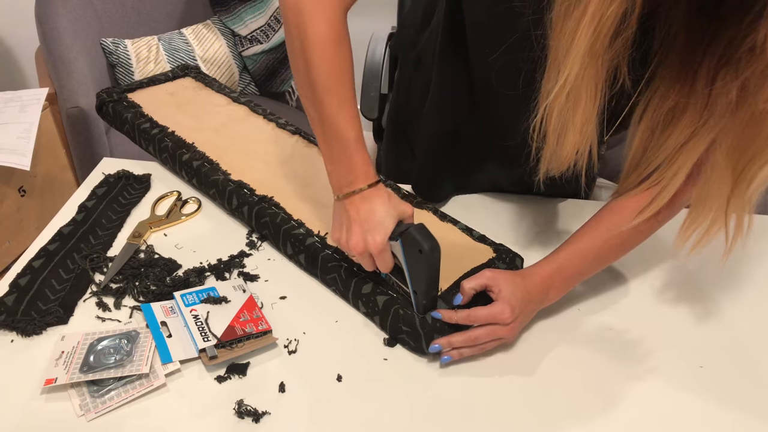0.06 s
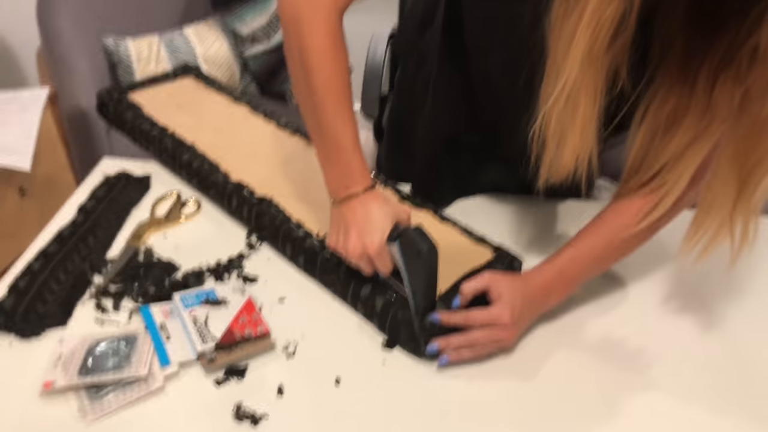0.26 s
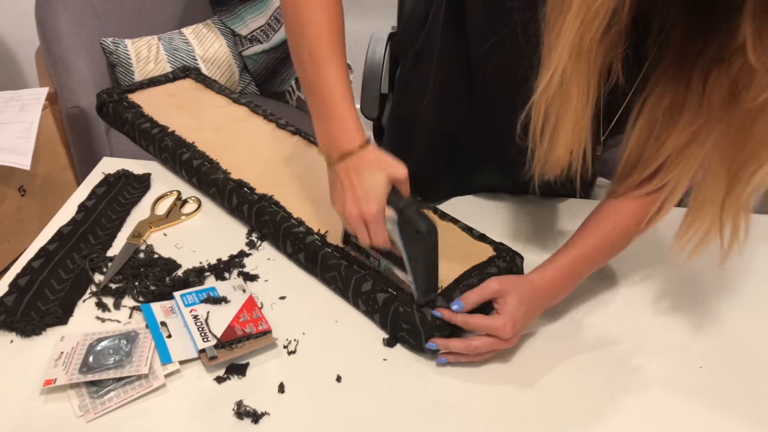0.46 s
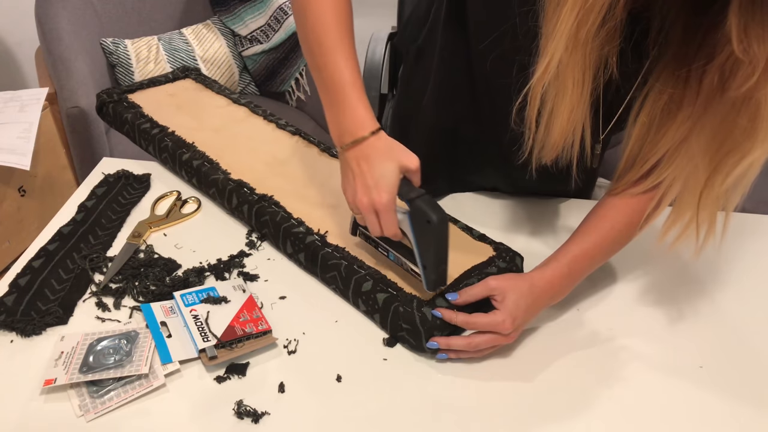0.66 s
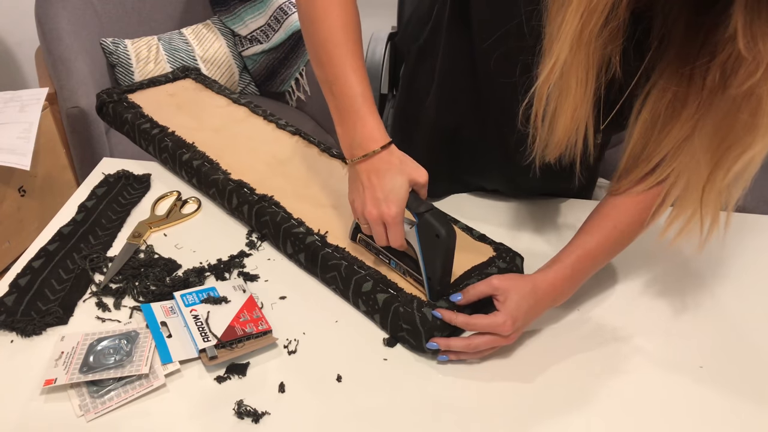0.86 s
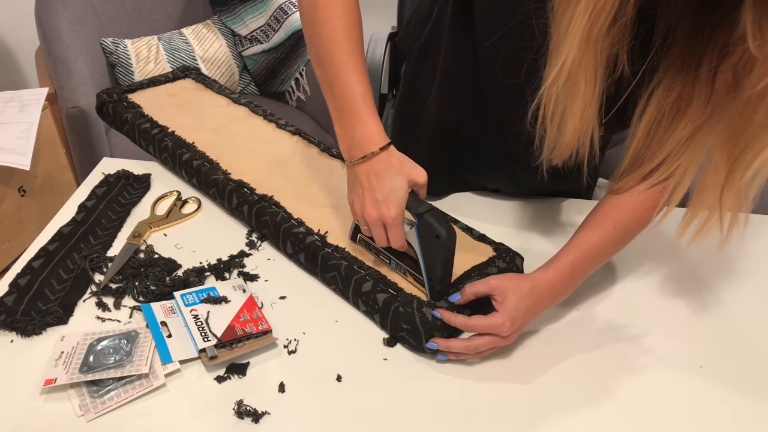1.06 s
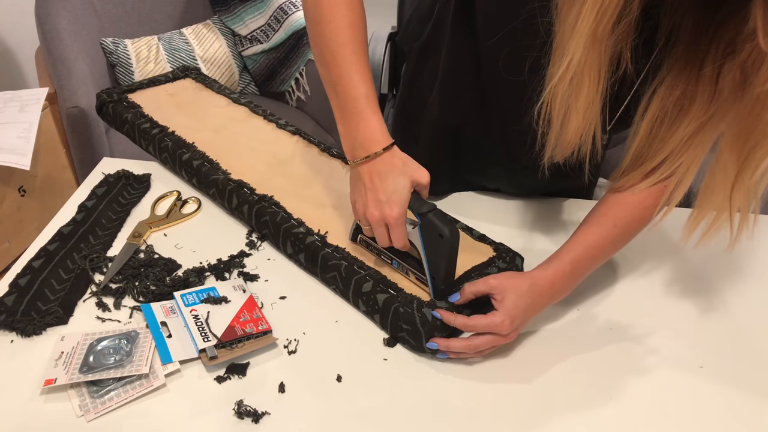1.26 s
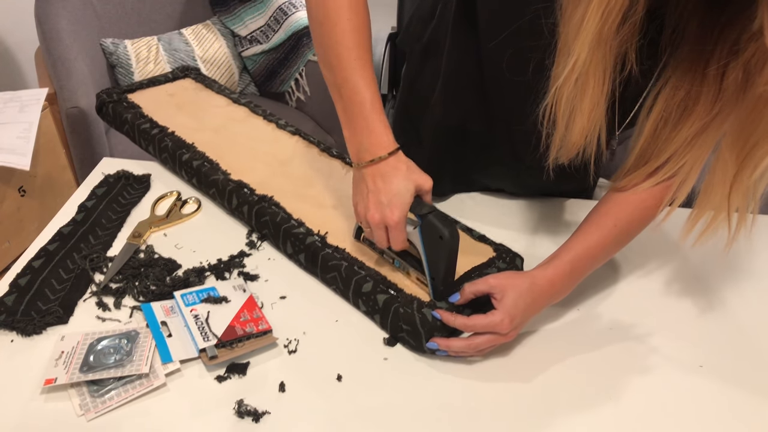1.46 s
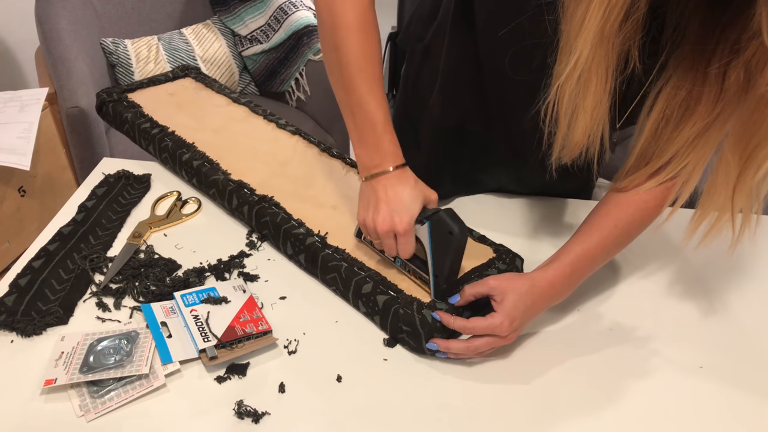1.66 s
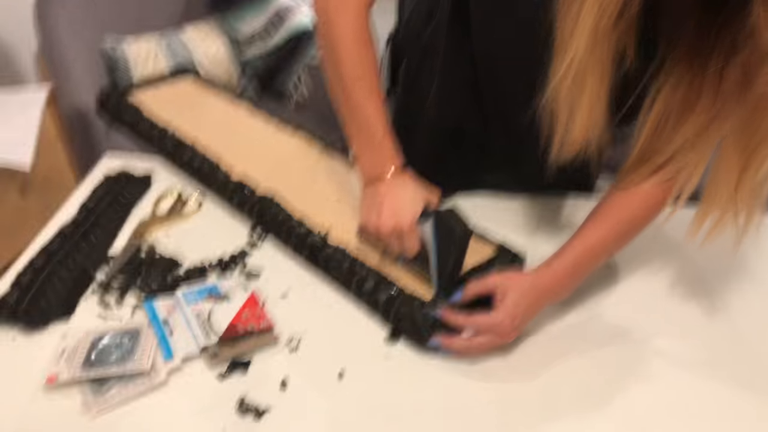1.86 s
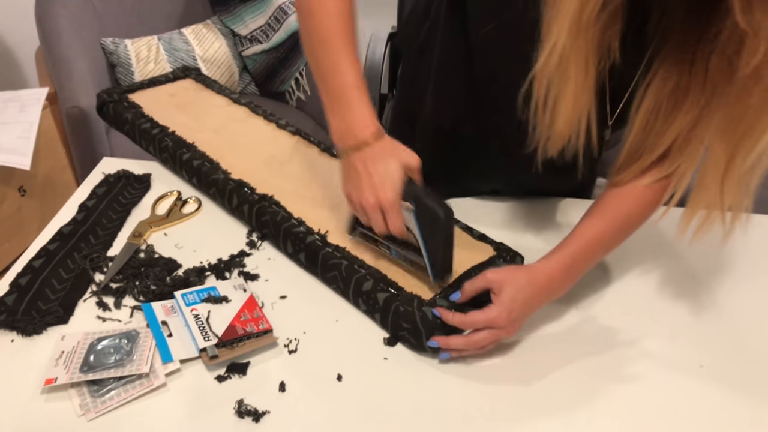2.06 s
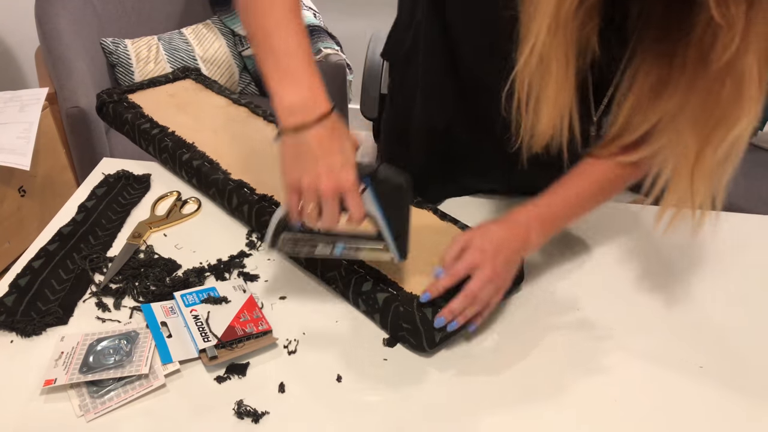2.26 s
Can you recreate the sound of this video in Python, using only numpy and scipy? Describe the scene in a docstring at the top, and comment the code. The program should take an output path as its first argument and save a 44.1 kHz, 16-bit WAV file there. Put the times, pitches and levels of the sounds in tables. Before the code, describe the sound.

A hand staple gun clicks at 0.15 s and slams a staple into a wooden frame at 0.22 s, a bright steel crack with a woody thud and short room echo. Low bumps at 0.4-0.5 s and a small click at 0.57 s follow. Quiet hum and air, then hand rustle around 1.5-1.8 s, a clack at 1.8 s, the second slam near 1.87 s, and light clicks and bumps from 2.06 to 2.2 s.

```python
"""Two hard slams: a hand staple gun drives staples through fabric into a wooden frame in a bare room.
Around them the handle cocks and springs back and the catch slips, as bursts of micro-impacts in steel modes.
Hands press the frame, ringing its low modes. Two coloured noises, one uneven with a squeezing hand's rustle
in it, and a hum of two sines lie underneath. The room is a diffuse noise tail; the recorder limits the slam
and ducks its gain for a moment after it."""
import sys
import numpy as np
from scipy import signal
from scipy.fft import rfft, irfft
from scipy.io import wavfile
from scipy.ndimage import uniform_filter1d, minimum_filter1d

SR = 44100
rng = np.random.default_rng(int(sys.argv[2]) if len(sys.argv) > 2 else 0)


def makeup_ratio(level_db):
    """Linear amplitude ratio for a level in decibels (20 dB per factor of ten)."""
    decades = np.asarray(level_db, float) / 20
    return 10 ** decades


def master(y):
    """Save y as 16-bit WAV."""
    cut = np.clip(np.atleast_2d(y).T, -1, 1)
    pcm = np.round(cut * 32767)  # scale
    wavfile.write(sys.argv[1], SR, pcm.astype(np.int16))


N = 101429
T = np.arange(N) / SR


def at_hz(points, hz):
    """Reads a spectrum table on a log-frequency axis."""
    table_hz, value = np.transpose(points)
    return np.interp(np.log(hz), np.log(table_hz), value)


def butter(x, cut_hz, kind):
    """Second-order Butterworth filter design, run over a sound."""
    return signal.sosfilt(signal.butter(2, cut_hz, kind, fs=SR, output="sos"), x)


def coloured(spectrum):
    """Steady noise of a given spectrum, scaled to rms 1."""
    hz = np.maximum(np.arange(N // 2 + 1) * SR / N, 1)
    inside = hz > 0.7 * spectrum[0][0]
    x = irfft(rfft(rng.standard_normal(N)) * makeup_ratio(at_hz(spectrum, hz)) * inside, N)
    return x / x.std()


def minimum_phase(spectrum, peaks=()):
    """Causal minimum-phase pulse with a given spectrum and resonant bumps, by folding the cepstrum."""
    hz = np.maximum(np.arange(4097) * SR / 8192, 1)
    db = at_hz(spectrum, hz)
    for peak_hz, width_hz, peak_db in peaks:
        db = db + peak_db / (1 + (2 * (hz - peak_hz) / width_hz) ** 2)
    cepstrum = irfft(np.log(makeup_ratio(db)))
    cepstrum[1:4096] *= 2
    cepstrum[4097:] = 0
    return irfft(np.exp(rfft(cepstrum)))


def ring(push, hz, t60):
    """One mode as a two-pole resonator: a push sets a sine ringing that falls 60 dB in t60 seconds."""
    radius, angle = makeup_ratio(-60 / (t60 * SR)), 2 * np.pi * hz / SR
    poles = [1, -2 * radius * np.cos(angle), radius * radius]
    return signal.lfilter([0, np.sin(angle)], poles, push + 1e-18)


MODE_SPREAD_DB = 1.5   # random spread of each mode's strength, drawn anew for every push


def strike(out, time_s, push, modes, tilt_db, size):
    """Adds one push ringing every mode of a body; the tilt is in dB per octave around 5 kHz."""
    push = np.pad(push, (0, size - len(push)))
    luck = rng.normal(0, 1, len(modes)) * MODE_SPREAD_DB
    sound = np.zeros(size)
    for k, (hz, db, t60) in enumerate(modes):
        level = makeup_ratio(db + luck[k] + tilt_db * np.log2(hz / 5000))
        sound += (-1) ** k * level * ring(push, hz, t60)
    return out + np.pad(sound, (int(time_s * SR), N))[:N]


FIRST_TOUCH_SHARE = 0.6   # share of the contact's energy in its first touch


def rattle(length_s):
    """A contact of about unit energy: a first touch, and fast micro-impacts that die away."""
    t = np.arange(2000) / SR
    impacts = rng.standard_normal(2000) ** 2 * rng.choice([-1, 1], 2000)
    impacts *= np.minimum(t / 0.00021, 1) * np.exp(-t / length_s)
    impacts /= np.sqrt(np.sum(impacts ** 2))
    touch = np.arange(2000) == 12
    return np.sqrt(1 - FIRST_TOUCH_SHARE) * impacts + np.sqrt(FIRST_TOUCH_SHARE) * touch


# air of the room: (frequency [Hz], relative density [dB per Hz])
AIR_SPECTRUM = [(25, -12.5), (60, -3), (90, -15), (250, -16), (600, -24), (2000, -32), (6000, -37),
                (10000, -39.5), (14500, -34), (16500, -44)]
AIR_DB = -67   # rms


def air():
    """The steady background is noise with a fixed spectrum."""
    return makeup_ratio(AIR_DB) * coloured(AIR_SPECTRUM)


# hum partials: (frequency [Hz], level [dB rms])
HUM_PARTIALS = [(60, -70), (120, -92)]


def hum():
    """The hum is a sum of steady sines."""
    return sum(np.sqrt(2) * makeup_ratio(db) * np.sin(2 * np.pi * hz * T) for hz, db in HUM_PARTIALS)


# level of the uneven background noise, with the rustle of a squeezing hand at 1.5-1.8 s:
# (time [s], level [dB rms])
UNEVEN_LEVEL = [(0, -73), (0.14, -71.5), (0.8, -71.5), (1.0, -76), (1.05, -107), (1.15, -104), (1.2, -74.5),
                (1.3, -76), (1.45, -81), (1.52, -64.5), (1.6, -68), (1.65, -63.5), (1.8, -68), (1.9, -74)]
# tone of that noise: (frequency [Hz], relative density [dB per Hz])
UNEVEN_SPECTRUM = [(150, -20.5), (250, -8.5), (320, 0.5), (450, -9.5), (960, -12), (1700, -15.5),
                   (1880, -6), (2080, -16.5), (3300, -16.5), (3600, -9.5), (3900, -16.5), (6000, -17),
                   (8000, -22), (15000, -26.5)]


def uneven_noise():
    """Coloured noise follows a level curve: an uneven background, and a hand's rustle at 1.5-1.8 s."""
    return makeup_ratio(np.interp(T, *np.transpose(UNEVEN_LEVEL))) * coloured(UNEVEN_SPECTRUM)


# modes of the wooden frame and table: (frequency [Hz], level [dB], t60 [s])
FRAME_MODES = [(50, -5.5, .1), (81.9, -15, .3), (118, -6, 0.071), (206.4, -8, 0.19), (300, -7, .1),
               (347.5, -5.5, 0.033), (386, -7, .12), (535, -5.5, 0.056), (743.4, -11.5, .08),
               (988.5, -5, 0.055), (1568, -5, 0.064), (1823, -11, .03), (2160, -7.5, .03), (2987, -8, .02)]
# hands and gun press on the frame:
# (time [s], level [dB], contact cut-off [Hz], contact floor [Hz], held below 0.9 of the cut-off)
PRESS_EVENTS = [(0.03, -55, 80.2, 29.8), (0.158, -35, 83, 29.8), (0.398, -15, 88.5, 59.6),
                (0.499, -24, 88, 65), (1.538, -38.5, 69.6, 29.7), (1.81, -40, 81, 29.4),
                (1.502, -41, 400.5, 261), (1.536, -40.5, 346, 257), (1.561, -41.5, 360, 255),
                (1.598, -48.5, 350, 251), (1.72, -49, 300, 181.5), (0.68, -44.5, 90, 50),
                (0.799, -50.5, 88.9, 45.4), (1.699, -42.5, 101, 29.7), (1.779, -48.5, 250, 30),
                (2.059, -22, 92, 53.3), (2.166, -28, 93, 60)]


def presses():
    """Soft contacts are band-limited pushes that reach only some low modes of frame and table."""
    out = np.zeros(N)
    for time_s, db, cut_hz, low_hz in PRESS_EVENTS:
        click = np.pad([makeup_ratio(db)], (0, 6000))
        push = butter(click, [min(low_hz, 0.9 * cut_hz), cut_hz], "band")
        out = strike(out, time_s, push, FRAME_MODES[:8], 0, size=30000)
    return out


# steel clicks in the gun:
# (time [s], level [dB], tilt [dB per octave], rattle decay [s], extra level sent to the room [dB])
CLICK_EVENTS = [(0.1517, -6, 1.5, 0.0023, 0), (0.2106, 0.5, 0.5, 0.0018, 3),
                (0.2371, 5.5, -5, 0.0037, -9.5), (0.5013, -30, 4, .0008, -3), (0.5365, -36, 4, .0012, -3),
                (0.5686, -17.5, 1.5, 0.0011, -1), (1.159, -49, 6, 0.00046, -7),
                (1.162, -45.5, 7.5, .0007, -1.5), (1.208, -54, 8.5, .001, -7),
                (1.5076, -33, 2.5, 0.00076, -1), (1.7977, -4, 1, 0.0036, -1.5),
                (1.867, 3.5, 1.4, .0007, 13), (2.1198, -33, 5, .0006, -6), (2.1422, -35, 3, .0007, -6),
                (2.1492, -38, 8, .0008, -6), (2.1835, -36, 7, .001, -3), (2.1745, -14, 0.5, 0.0017, -10)]
# modes of the steel body: (frequency [Hz], level [dB], t60 [s])
STEEL_MODES = [(2200, -10.5, .005), (2780, -1.5, 0.0061), (3420, 1.5, .008), (3820, 0, .009),
               (4710, -7.5, 0.013), (5500, -5.5, .007), (6500, -2, .006), (7250, -3.5, 0.0078),
               (8780, -4.5, 0.0064), (9650, -4, 0.0068), (12730, -7.5, .004)]
# power a click sends out as a broad tap: (frequency [Hz], relative density [dB per Hz])
TAP_SPECTRUM = [(120, -34), (200, -3.5), (909, -11.5), (1340, -10.5), (1470, -12), (2210, -10),
                (4290, -2.5), (5160, -10.5), (13200, -17.5), (15600, -18.5), (16500, -34.5)]
STEEL_DB, TAP_NEAR_DB, TAP_ROOM_DB = -13, 13.5, 19.5
CLICK_CUT_HZ = 740   # high-pass on the direct sound


def clicks():
    """Catch, handle, spring and rebounding driver rattle the steel modes; a broad tap feeds the room."""
    near, far = np.zeros(N + SR), np.zeros(N + SR)
    for time_s, db, tilt_db, length_s, room_db in CLICK_EVENTS:
        push, i = makeup_ratio(db) * rattle(length_s), int(time_s * SR)
        tilted = [(hz, d + tilt_db * np.log2(hz / 5000)) for hz, d in TAP_SPECTRUM]
        tap = minimum_phase(tilted)
        near[:N] = strike(near[:N], time_s, makeup_ratio(STEEL_DB) * push, STEEL_MODES, tilt_db, size=3000)
        near[i:i + 3000] += makeup_ratio(TAP_NEAR_DB) * np.convolve(push, tap[:1001])
        far[i:i + len(tap)] += makeup_ratio(db + room_db + TAP_ROOM_DB) * tap
    return np.array([butter(near, CLICK_CUT_HZ, "high"), far])[:, :N]


# the driver slams the staple home:
# (time [s], level [dB], steel tilt [dB per octave], wood level [dB])
SLAM_EVENTS = [(0.2185, 9.5, 3, -10.5), (1.8762, 7.5, -1, -17)]
# power the slam sends into the room: (frequency [Hz], relative density [dB per Hz])
BLOW_SPECTRUM = [(35, -34.5), (60, -10), (85, -9), (208, -7.5), (290, -7.5), (509, -3.5), (796, -4.5),
                 (983, -0.5), (1370, -2.5), (1470, -3.5), (2350, -2), (4640, -7.5), (5600, -7.5),
                 (14700, -18.5), (16500, -41)]
# resonant bumps on the blow: (frequency [Hz], width [Hz], height [dB])
BLOW_BUMPS = [(1009, 140, 2.5), (1480, 150, 5), (1950, 250, 2.5), (3650, 350, 4), (4500, 310, 2),
              (8000, 400, -2.5)]
BLOW_DB = 33.5
STEEL_PUSH_S, WOOD_PUSH_S = 0.0057, 0.002   # decay times of the rattles
CRACK_DB, CRACK_CUT_HZ = 9, 1500
THUD_DELAY_S, THUD_DB, THUD_CUT_HZ = 0.028, 6, 73   # the table gives under the blow


def slams():
    """Steel body, broad crack and wood sound at once, the table thuds after; a blow feeds the room."""
    near, far = np.zeros(N), np.zeros(N)
    blow = minimum_phase(BLOW_SPECTRUM, BLOW_BUMPS)
    for time_s, db, tilt_db, wood_db in SLAM_EVENTS:
        push, i = makeup_ratio(db) * rattle(STEEL_PUSH_S), int(time_s * SR)
        near = strike(near, time_s, push, STEEL_MODES, tilt_db, size=3000)
        crack = butter(push, CRACK_CUT_HZ, "high")
        near[i:i + len(crack)] += makeup_ratio(CRACK_DB) * crack
        wood_push = makeup_ratio(wood_db) * rattle(WOOD_PUSH_S)
        near = strike(near, time_s, wood_push, FRAME_MODES, 0, size=30000)
        thud = butter(np.pad([makeup_ratio(wood_db + THUD_DB)], (0, 4000)), THUD_CUT_HZ, "low")
        # the thud rings the lowest mode alone
        near = strike(near, time_s + THUD_DELAY_S, thud, FRAME_MODES[:1], 0, size=30000)
        far[i:i + len(blow)] += makeup_ratio(db + BLOW_DB) * blow
    return np.array([near, far])


# how long the echoes last: (frequency [Hz], t60 [s])
ECHO_T60 = [(60, .45), (250, 0.41), (1000, 0.53), (2000, 0.53), (2900, 0.47), (4200, 0.53), (6000, 0.48),
            (8500, 0.43), (15000, 0.28)]
# tone of the echoes: (frequency [Hz], relative level [dB])
ECHO_COLOUR = [(60, 2), (250, 4), (1000, -6.1), (2000, -4.75), (4000, -1.74), (8000, -2), (16000, 1)]
ROOM_DB, FIRST_ECHO_S, BUILD_S = -34, 0.0045, 0.004


def room(x):
    """Diffuse echoes: third-octave bands of noise that build up and die away, each at its own rate."""
    t, edges = T[:SR], 30 * 2 ** np.arange(0, 9.4, 1 / 3)
    # neighbouring bands take turns on two independent noises
    white, tail = rng.standard_normal((2, SR)), np.zeros(SR)
    for k, (low, high) in enumerate(zip(edges, edges[1:])):
        hz = np.sqrt(low * high)
        band = butter(white[k % 2], [low, high], "band")
        tail += band * makeup_ratio(at_hz(ECHO_COLOUR, hz) - 60 * t / at_hz(ECHO_T60, hz))
    tail *= np.clip((t - FIRST_ECHO_S) / BUILD_S, 0, 1)
    return makeup_ratio(ROOM_DB) * signal.fftconvolve(x, tail)[:N]


def scene():
    """Air, hum, uneven noise and presses under the gun, heard directly and through the room."""
    near, far = clicks() + slams()
    return (air() + hum() + uneven_noise() + presses() + near + room(far))[None]


def cut_db(excess_db, hold_s, ahead_s, release_db_per_s):
    """Gain cut that follows an excess level: held, released steadily, its attack smoothed ahead."""
    hold, ahead = int(hold_s * SR) + 1, int(ahead_s * SR) + 1
    held = -minimum_filter1d(np.pad(-excess_db, (hold // 2, 0))[:N], hold)
    release = release_db_per_s * T
    let_go = np.maximum.accumulate(held + release) - release
    early = np.pad(let_go, (0, ahead), "edge")[ahead // 2:ahead // 2 + N]
    return uniform_filter1d(early, ahead)


DUCK_FROM_DB, DUCK_MOST_DB, DUCK_WINDOW_S = -15.5, 10, 0.03   # threshold, deepest cut, power window


def duck(x):
    """Slow gain control: power above a threshold pulls the gain down for a moment after loud sound."""
    window = int(DUCK_WINDOW_S * SR)
    power = uniform_filter1d(np.pad(x ** 2, (window // 2, 0))[:N], window)
    loud_db = 10 * np.log10(np.maximum(power, 1e-12))
    excess_db = np.clip(loud_db - DUCK_FROM_DB, 0, DUCK_MOST_DB)
    return x * makeup_ratio(-cut_db(excess_db, hold_s=0.16, ahead_s=0.0059, release_db_per_s=58.5))


LIMIT_DB = -4   # peak threshold


def limit(x):
    """Fast limiter: the excess of each peak over the threshold turns the gain down, then quickly lets go."""
    peak_db = 20 * np.log10(np.abs(x) + 1e-9)
    excess_db = np.maximum(peak_db - LIMIT_DB, 0)
    return x * makeup_ratio(-cut_db(excess_db, hold_s=0.00039, ahead_s=0.00039, release_db_per_s=1503))


def low_pass(x):
    """Removes everything above the highest recorded frequency."""
    return signal.sosfilt(signal.butter(12, 17050, fs=SR, output="sos"), x)


def record(dry):
    """A steep low-pass (60 dB down from 17.3 kHz), then the slow ducking, then the fast limiter."""
    low_passed = signal.sosfilt(signal.cheby2(10, 60, 17300, fs=SR, output="sos"), dry[0])
    mix = limit(duck(low_passed))[None]
    return low_pass(mix)


dry = scene()
out = record(dry)
master(out)
```